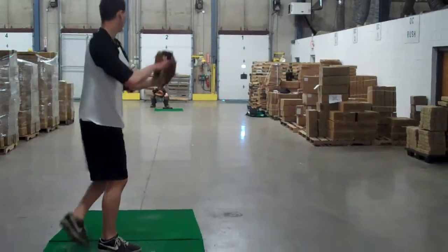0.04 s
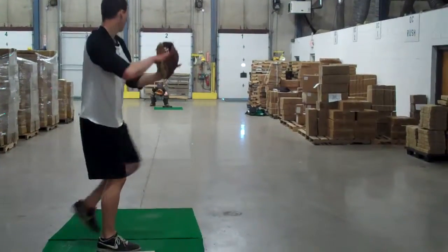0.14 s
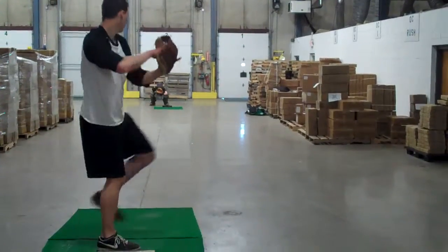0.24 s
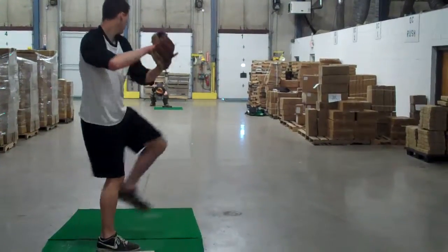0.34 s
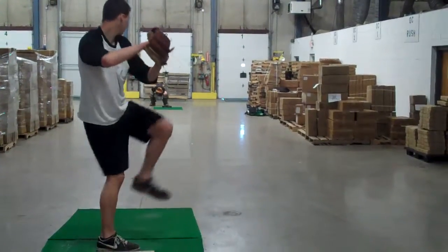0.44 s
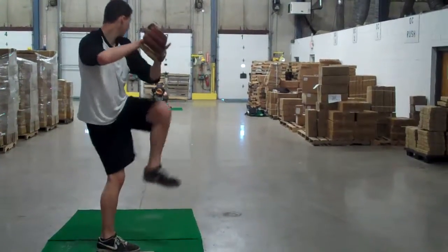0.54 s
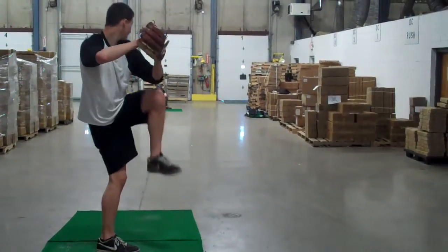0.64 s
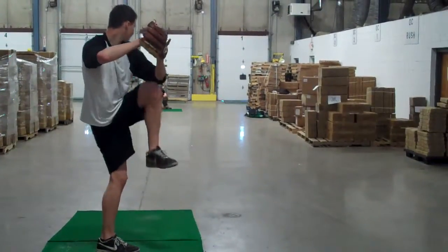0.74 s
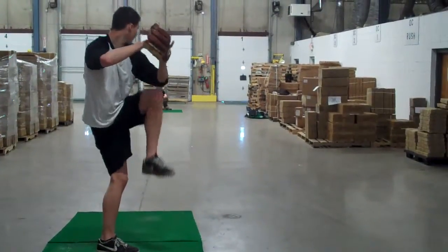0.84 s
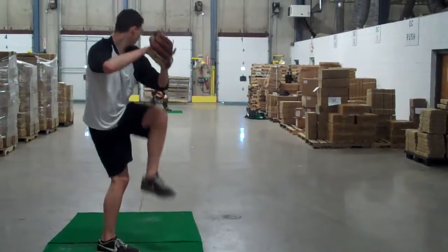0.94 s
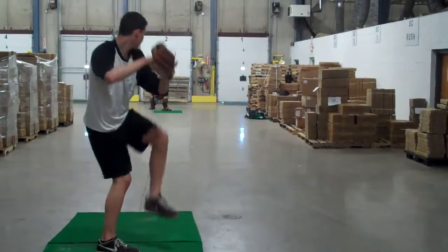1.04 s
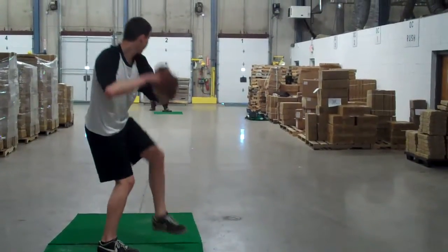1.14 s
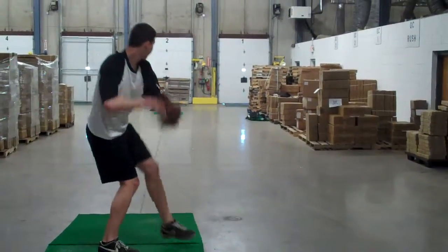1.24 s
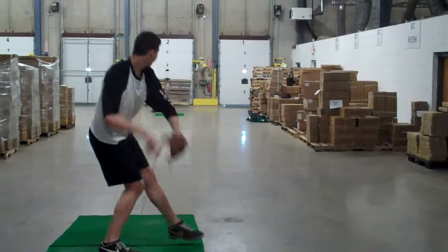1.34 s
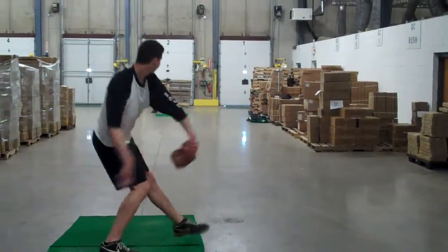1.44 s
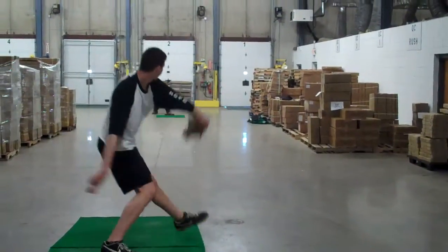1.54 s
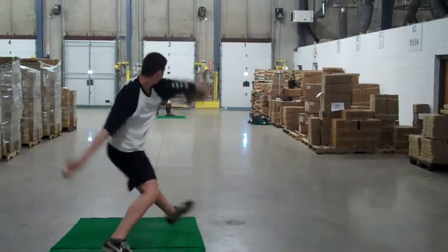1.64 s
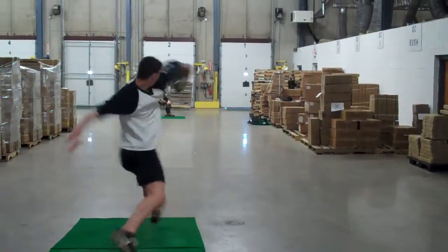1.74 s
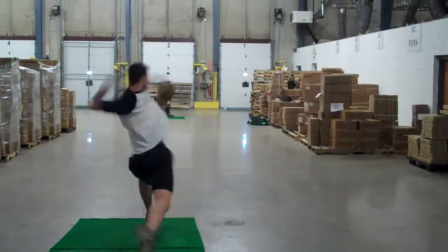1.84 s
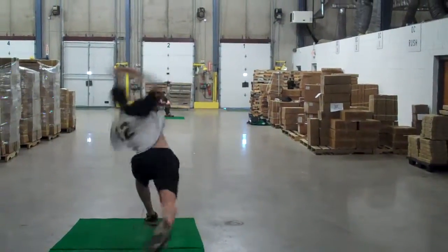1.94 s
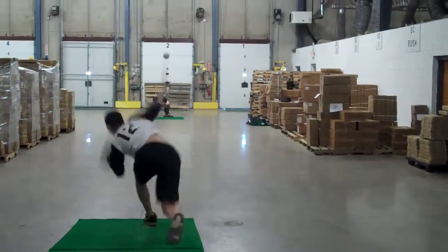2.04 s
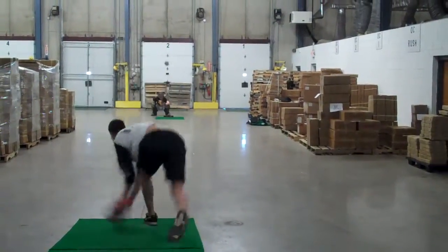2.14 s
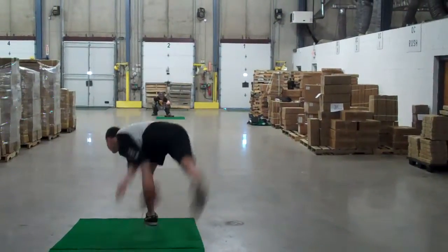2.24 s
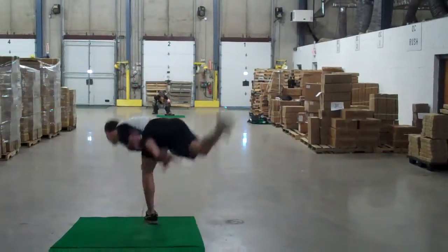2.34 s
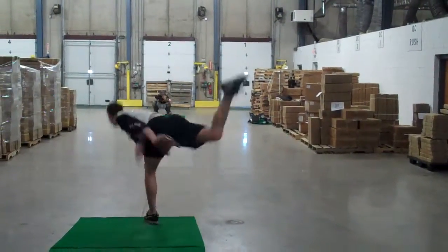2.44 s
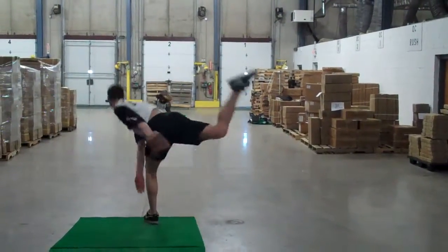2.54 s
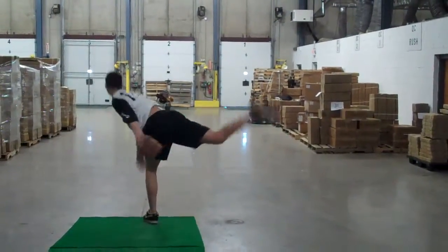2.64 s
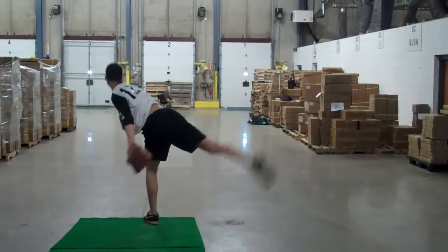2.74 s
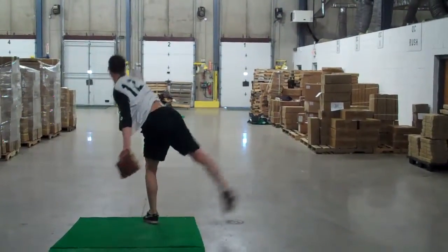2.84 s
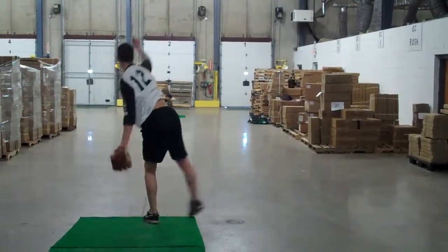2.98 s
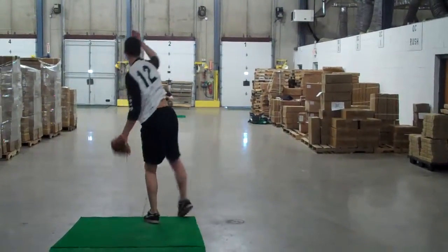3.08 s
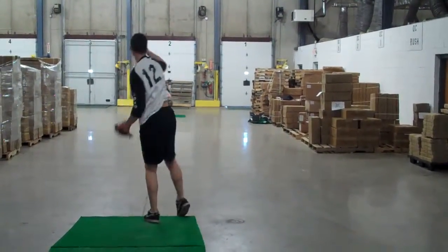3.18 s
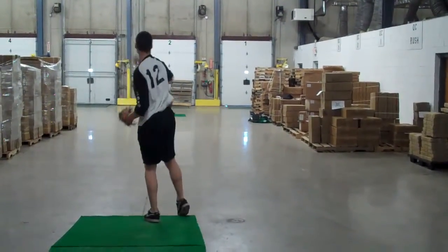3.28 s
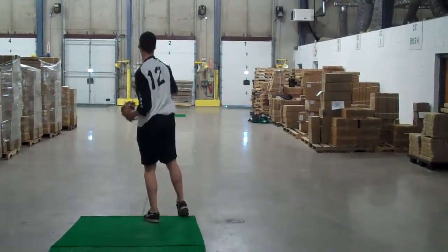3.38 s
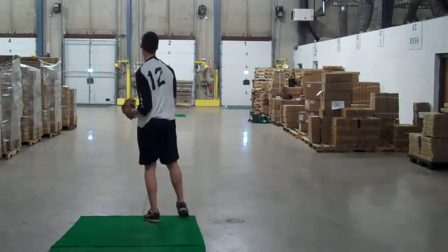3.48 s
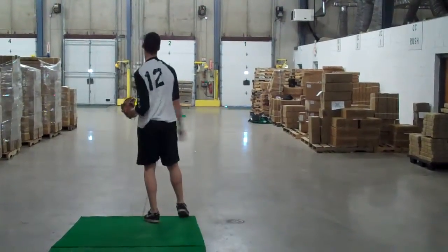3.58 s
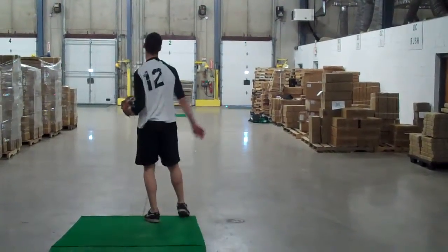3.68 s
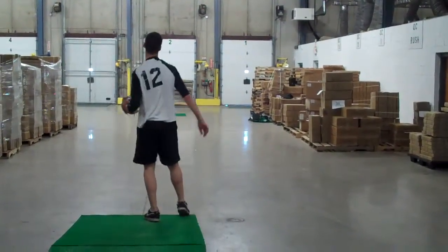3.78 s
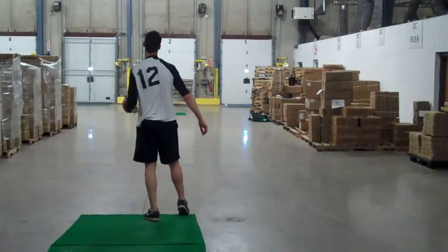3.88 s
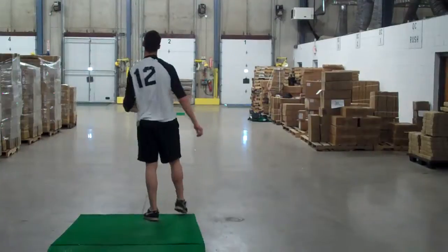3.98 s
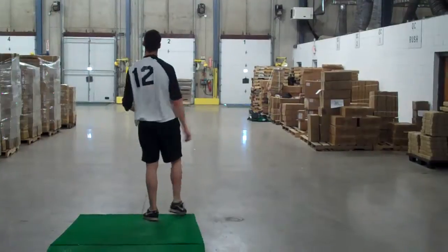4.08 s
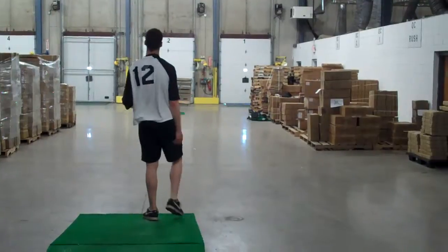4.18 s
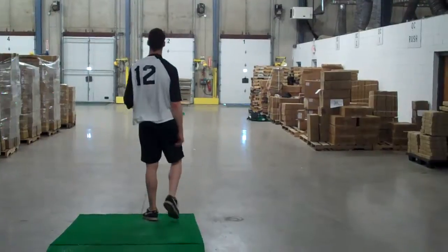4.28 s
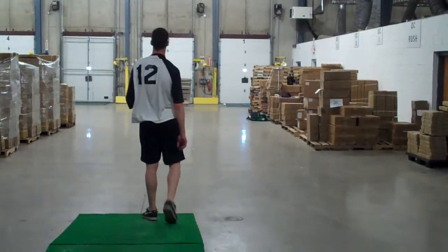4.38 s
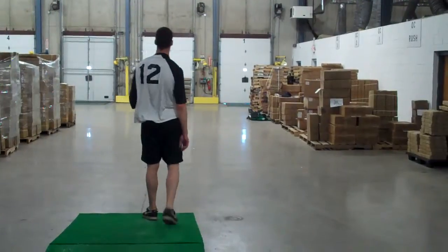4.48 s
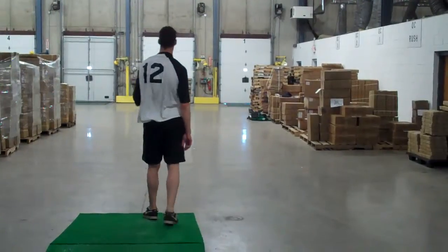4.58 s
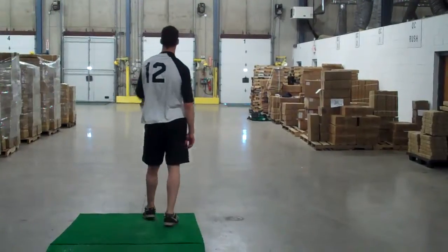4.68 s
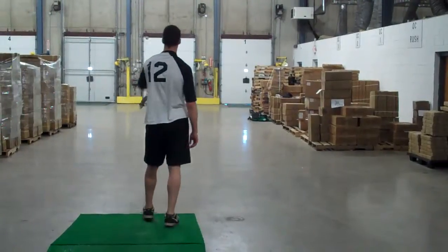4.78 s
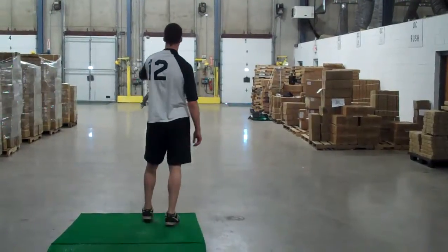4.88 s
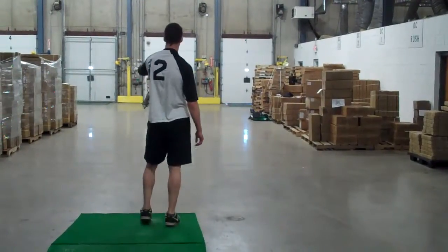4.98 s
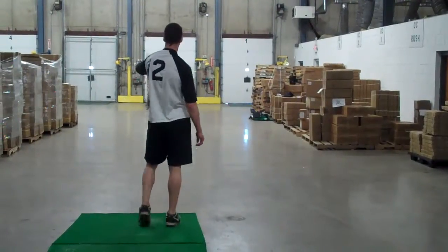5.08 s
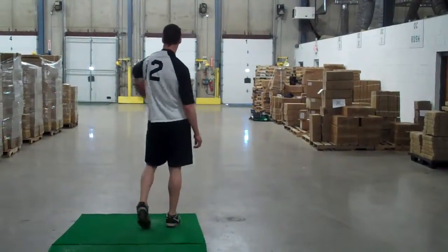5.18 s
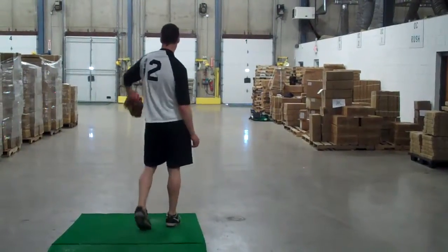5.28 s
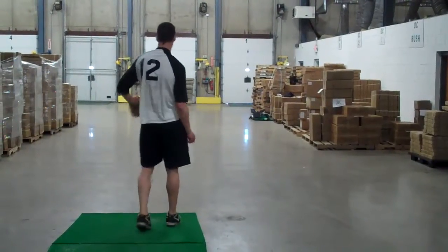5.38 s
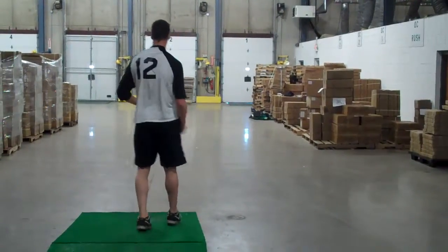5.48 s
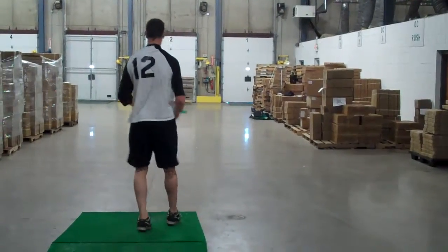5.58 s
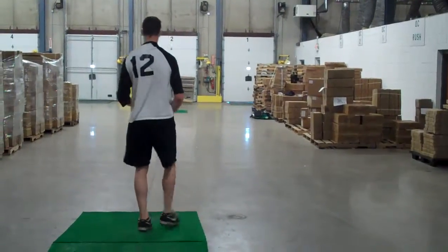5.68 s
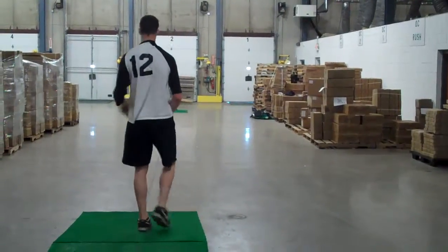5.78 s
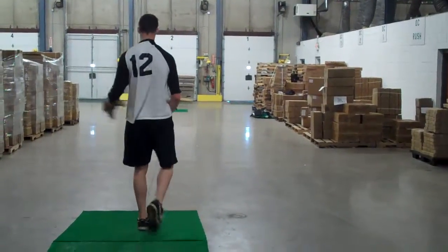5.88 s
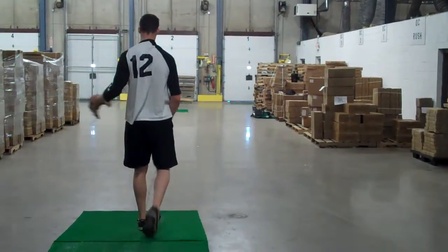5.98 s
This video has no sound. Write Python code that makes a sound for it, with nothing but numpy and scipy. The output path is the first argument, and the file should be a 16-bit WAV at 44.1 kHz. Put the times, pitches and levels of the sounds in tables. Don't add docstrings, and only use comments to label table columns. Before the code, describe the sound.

Low ventilation hum, a pitcher's footfalls and cloth swish, then a sharp leather pop ringing off bare walls, later a softer glove slap.

```python
import sys
import numpy as np
from scipy import signal
from scipy.io import wavfile

SR = 44100
rng = np.random.default_rng(int(sys.argv[2]) if len(sys.argv) > 2 else 0)


def voltage_ratio(decibels):
    exponent = np.asarray(decibels, float) / 20
    return 10 ** exponent


def inscribe(sig):
    pcm = np.round(np.clip(np.atleast_2d(sig).T, -1, 1) * 32767)
    wavfile.write(sys.argv[1], SR, pcm.astype(np.int16))


N = 265477
T = np.arange(N) / SR

# start_s [s], pocket_db [dB peak], crack_db [dB], left_right_db [dB]
POP_ARRIVALS = [(2.865, -3.5, -7.5, 2), (2.8663, -2, -17, 2), (2.8726, -10, -11.5, 1), (2.876, -6, -9.5, 6),
                (2.878, 0.5, -8.5, -2.5), (2.880, -5, -10, 0), (2.8838, -1, -10, 1), (2.888, -11, -11, -1),
                (2.895, -10.5, -11, 8), (2.902, -6, -13, 1), (2.908, 0.5, -23, -0.5), (2.9115, -1, -17, 4),
                (2.916, -9, -16, 2.5), (2.935, -8, -26, 1.2), (2.95, -12, -31, 7)]
# start_s [s], pocket_db [dB peak], crack_db [dB], left_right_db [dB]
CATCH_ARRIVALS = [(5.335, -14, -12, 2), (5.3366, -16.5, -16, 7), (5.3383, -20, -24, -4),
                  (5.342, -15.5, -35, 1.5), (5.3531, -7.5, -18.5, 4), (5.3554, -2, -29, -2.5),
                  (5.367, -6.5, -32, 4), (5.404, -17, -35, -1), (5.412, -19, -37, 3), (5.420, -28, -41, 2),
                  (5.431, -30, -39, 3), (5.474, -20, -21, 4), (5.478, -24, -20.5, 1), (5.4825, -12, -20, 1),
                  (5.486, -16, -25, 1), (5.49, -18, -26, 2.5)]
# pitch_hz [Hz], likeness [0-1]
HALL_LIKENESS = [(60, 1), (130, .98), (300, 1), (700, 0.95), (1400, 0.85), (3000, 0.56), (6000, 0.05),
                 (15000, 0)]


def rms_one(x):
    return x / np.sqrt(np.mean(x ** 2) + 1e-20)


def at_hz(points, hz):
    table_hz, values = np.array(points).T
    return np.interp(np.log(hz), np.log(table_hz), values)


def drift(rate_hz):
    r = np.exp(-80 * np.pi * rate_hz / SR)
    white = rng.standard_normal(N // 40 + 2002)
    slow = signal.lfilter([1], [1, -2 * r, r * r], white)[2000:]
    return np.interp(np.arange(N) / 40, np.arange(len(slow)), rms_one(slow))


def resonate(x, hz, width_hz):
    r = np.exp(-np.pi * width_hz / SR)
    feed = np.array([1, 0, -1]) * (1 - r * r) / 2
    return signal.lfilter(feed, [1, -2 * r * np.cos(2 * np.pi * hz / SR), r * r], x)


def resonate_twice(x, hz, width_hz):
    return resonate(resonate(x, hz, width_hz), hz, width_hz)


def bands(spectrum, likeness, size, order=2, count=3):
    edges = 20 * 2 ** (np.arange(int(9.7 * count) + 1) / count)
    centres = np.sqrt(edges[1:] * edges[:-1])
    gains = voltage_ratio(at_hz(spectrum, centres))
    gains = gains / np.sqrt(np.sum(gains ** 2 * np.diff(edges)) * 2.2 / SR)
    white = rng.standard_normal((2, 2, size))
    inside = (centres > spectrum[0][0]) & (centres < spectrum[-1][0] * 1.2)
    for k in np.flatnonzero(inside):
        sos = signal.butter(order, edges[k:k + 2], "band", fs=SR, output="sos")
        mid, side = signal.sosfilt(sos, white[k % 2])
        alike = np.clip(at_hz(likeness, centres[k]), 0, 1)
        stereo = np.sqrt((1 + alike) / 2) * mid + np.sqrt((1 - alike) / 2) * side * [[1], [-1]]
        yield centres[k], gains[k] * stereo


def burst(size, t60):
    x = rng.standard_normal(size) * voltage_ratio(-60 * T[:size] / t60)
    return x / np.abs(x).max()


def placed(x, s):
    out, i = np.zeros((2, N)), round(s * SR)
    out[:, i:i + x.shape[1]] = x[:, :N - i]
    return out


def struck_hide(modes, t60, top_hz, wide, solid, swell):
    size = len(swell)
    puff = swell * (burst(size, t60) + wide * burst(size, t60) * [[1], [-1]])
    puff = puff + solid * np.exp(-T[:size] / 0.00008)
    rung = sum((-1) ** k * voltage_ratio(db) * resonate(puff, hz, width_hz)
               for k, (hz, width_hz, db) in enumerate(modes))
    dull = signal.butter(3, np.clip(top_hz, 2000, 18000), fs=SR, output="sos")
    rung = signal.sosfilt(dull, rung)
    return rung / np.abs(rung).max()


def leather(arrivals, pocket, crack, pocket_t60, crack_t60, crack_db):
    size = 3000
    out = np.zeros((2, N))
    for s, pocket_db, bright_db, pan_db in arrivals:
        late = s - arrivals[0][0]
        swell = 1 - np.exp(-T[:size] / (.0001 + .012 * min(late, .05)))
        low = struck_hide(pocket, pocket_t60, 2600, wide=.15, solid=1.5, swell=swell)
        bright_top_hz = 15000 / (1 + late / 0.053)
        bright = struck_hide(crack, crack_t60, bright_top_hz, wide=.4, solid=.3, swell=swell)
        sound = voltage_ratio(pocket_db) * low + voltage_ratio(bright_db + crack_db) * bright
        i = round((s + .0008) * SR)
        out[:, i:i + size] += sound * voltage_ratio([[pan_db / 2], [-pan_db / 2]])
    return out


def push(s):
    # pitch_hz [Hz], width_hz [Hz], level_db [dB peak]
    pocket_air = [(184, 33, -25.5), (280, 92, -7), (60, 49, -35)]
    t = T[:4000]
    thump = sum(voltage_ratio(db) * np.sin(2 * np.pi * hz * t) * np.exp(-np.pi * w * t) for hz, w, db in pocket_air)
    return placed(thump[None], s)


def mitt_pop():
    # pitch_hz [Hz], width_hz [Hz], level_db [dB]
    mitt_pocket = [(524, 260, -7), (760, 270, -7), (1026, 190, -0.5), (1480, 470, -7.5)]
    # pitch_hz [Hz], width_hz [Hz], level_db [dB]
    mitt_crack = [(2690, 720, 2.5), (3960, 760, 4.5), (5500, 1600, -5.5), (8100, 1850, -13.5),
                  (12200, 2000, -38)]
    slap = leather(POP_ARRIVALS, mitt_pocket, mitt_crack, pocket_t60=0.0071, crack_t60=0.0097, crack_db=11.5)
    return voltage_ratio(0.5) * slap + push(POP_ARRIVALS[0][0] + 0.00071)


def glove_catch():
    # pitch_hz [Hz], width_hz [Hz], level_db [dB]
    glove_pocket = [(480, 350, -9), (810, 166, 2.5), (1700, 1200, -10.5)]
    # pitch_hz [Hz], width_hz [Hz], level_db [dB]
    glove_crack = [(2290, 980, -1.5), (3840, 640, 3.5), (5670, 1660, -2), (8000, 6300, -14.5),
                   (12040, 4000, -36)]
    return leather(CATCH_ARRIVALS, glove_pocket, glove_crack, pocket_t60=0.015, crack_t60=0.0093, crack_db=8.0)


def hall(spectrum, t60, rise_s, early_db, early_s, lumpy_db, size):
    t = T[:size]
    build = (1 - np.exp(-(t / rise_s) ** 2)) * (1 + voltage_ratio(early_db) * np.exp(-t / early_s))
    clusters = [lumpy_db * drift(44)[:size] for k in range(4)]
    ringing = 0
    for k, (hz, noise) in enumerate(bands(spectrum, HALL_LIKENESS, size, order=3, count=5)):
        ringing = ringing + noise * voltage_ratio(-60 * t / at_hz(t60, hz) + clusters[k // 3 % 4])
    return build * ringing


def pop_ringing():
    # pitch_hz [Hz], level_db [dB per Hz]
    pop_tail = [(59, -72.5), (100, -16), (157, -12.5), (245, -3), (480, -1), (531, -7.5), (979, -3),
                (1770, -7), (2120, -4), (4240, -10.5), (7970, -22.5), (10800, -29.5), (13000, -90)]
    # pitch_hz [Hz], t60_s [s]
    pop_decay = [(100, 1.6), (300, 1.3), (700, 1.7), (1200, 1.95), (2500, 1.42), (4000, 1.245),
                 (6000, 0.81), (9000, 0.56), (14000, .2)]
    return hall(pop_tail, pop_decay, rise_s=0.0048, early_db=1.0, early_s=0.097, lumpy_db=2.0, size=70000)


def catch_ringing():
    # pitch_hz [Hz], level_db [dB per Hz]
    catch_tail = [(88, -44), (150, -17), (329, -13.5), (368, -10), (706, -1.5), (952, -4), (1170, -14),
                  (1760, -1), (2010, -15.5), (2420, -5), (4160, -10), (8950, -24.5), (11000, -34),
                  (12500, -70)]
    # pitch_hz [Hz], t60_s [s]
    catch_decay = [(100, 1.9), (300, 0.96), (700, 1.62), (1200, 1.78), (2500, 1.24), (4000, 1.1),
                   (6000, 0.68), (9000, 0.64), (14000, 0.27)]
    tail = hall(catch_tail, catch_decay, rise_s=0.0028, early_db=-23, early_s=0.04, lumpy_db=2.5, size=32000)
    s, gap_s = CATCH_ARRIVALS[0][0], .016
    return placed(tail, s + gap_s) + voltage_ratio(-14.0) * placed(tail[::-1], s)


def thuds():
    # start_s [s], pitch_hz [Hz], t60_s [s], level_db [dB peak]
    landings = [(.907, 360, 0.05, -41), (.95, 330, .15, -51), (2.305, 330, .06, -40),
                (1.976, 107.8, 0.46, -35), (2.065, 383, 0.13, -35.5), (2.07, 638, 0.053, -35.5),
                (2.084, 106.8, 0.25, -37), (2.12, 417, 0.098, -42), (2.241, 520, 0.18, -35.5),
                (2.26, 184, 0.11, -32), (2.29, 261, 0.04, -32.5)]
    out = 0
    for s, hz, t60, db in landings:
        t = np.maximum(T - s, 0)
        swell = 1 - np.exp(-t / 0.0054)
        sagging = np.sin(2 * np.pi * hz * t * (1 - 0.46 * np.minimum(t, .3)))
        out = out + voltage_ratio(db - 60 * t / t60) * swell * sagging
    return out


def ticks():
    # start_s [s], level_db [dB peak], centre_hz [Hz], t60_s [s]
    snaps = [(.480, -52, 3500, .012), (0.9039, -32.5, 3000, 0.026), (.9052, -30.5, 1700, 0.039),
             (.932, -47.5, 1900, .05), (1.067, -40.5, 3300, .015), (1.220, -43, 4000, 0.013),
             (1.9138, -36, 5500, 0.0061), (1.9502, -31, 3160, 0.036), (1.952, -37, 1200, 0.031),
             (1.976, -35.5, 5000, 0.048), (2.192, -38, 4120, 0.047), (2.2215, -38, 2500, 0.027),
             (2.252, -36, 2460, .015), (3.389, -39, 2440, .03), (3.911, -44, 2480, .018),
             (4.70, -53, 3000, .044), (4.745, -45, 3500, .028), (5.9988, -34, 1800, 0.014)]
    # start_s [s], level_db [dB peak], pitch_hz [Hz]
    rings = [(.9042, -40, 5100), (.906, -49, 3040), (.934, -39, 1550), (.938, -46, 3580), (.946, -48, 1980),
             (.988, -54, 3400), (1.221, -51, 1340), (1.9501, -38, 1470), (1.952, -42.5, 495),
             (1.953, -41, 5100), (1.976, -38, 2020), (1.978, -38.5, 5230), (2.2215, -34, 746),
             (3.389, -33, 3300), (3.911, -41, 1360), (4.70, -51, 1470), (5.9984, -29.5, 1420)]
    size = 4000
    out = np.zeros(N + size)

    def puff(t60):
        return burst(size, t60) * (1 - np.exp(-T[:size] / (0.034 * t60)))

    def add(s, db, x):
        i = round(s * SR)
        out[i:i + size] += voltage_ratio(db) * x / np.abs(x).max()

    for s, db, hz, t60 in snaps:
        sos = signal.butter(3, [hz / 3, min(hz * 2, 9500)], "band", fs=SR, output="sos")
        add(s, db, signal.sosfilt(sos, puff(t60)))
    for s, db, hz in rings:
        add(s, db, resonate_twice(puff(.025), hz, width_hz=340))
    return out[:N]


def gestures(rows):
    power = 0
    for s, swell, db in rows:
        t = T - s
        rise = np.exp(-2 * (t / swell) ** 2)
        fade = np.exp(-2 * np.abs(t) / (1.44 * swell))
        power = power + voltage_ratio(2 * db) * np.where(t < 0, rise, fade)
    return np.sqrt(power)


def grainy(spectrum):
    noise = sum(noise for hz, noise in bands(spectrum, HALL_LIKENESS, N))
    return noise * voltage_ratio(1.5 * drift(70))


def body():
    # peak_s [s], swell_s [s], level_db [dB]
    weight = [(1.995, 0.022, -42), (2.104, 0.035, -42), (2.256, .05, -41), (2.31, 0.024, -41.5),
              (2.45, .06, -50)]
    # peak_s [s], swell_s [s], level_db [dB]
    drags = [(.01, .05, -59), (.99, 0.073, -55), (2.064, 0.052, -44.5), (2.104, 0.042, -43.5),
             (2.256, 0.07, -46.5), (2.4, 0.087, -51), (2.6, 0.086, -57), (4.6, 0.31, -57),
             (4.72, 0.044, -54.5), (4.85, 0.054, -54), (5.05, 0.095, -58)]
    # peak_s [s], swell_s [s], level_db [dB]
    sweeps = [(.1, 0.056, -57.5), (1.99, 0.018, -45), (2.09, 0.095, -45.5), (2.256, .05, -46),
              (2.4, 0.083, -56), (2.55, 0.078, -56), (4.55, 0.11, -58), (4.74, 0.11, -57.5),
              (4.87, .05, -62)]
    # pitch_hz [Hz], level_db [dB per Hz]
    scrape = [(250, -2), (400, 3), (800, 2), (1500, 3), (2500, -6.5), (3500, -41)]
    # pitch_hz [Hz], level_db [dB per Hz]
    swish = [(1800, -5.5), (2800, 5), (4000, 1), (5500, -1), (7000, -3), (9500, -7.5), (11500, -25),
             (14000, -36)]
    white = rng.standard_normal(N)
    mat = rms_one(resonate(white, 93, 26) + voltage_ratio(-2.5) * resonate(white, 157, 86))
    rumble = voltage_ratio(-2.0) * gestures(weight) * mat
    return rumble + gestures(drags) * grainy(scrape) + gestures(sweeps) * grainy(swish)


def squeaks():
    # start_s [s], length_s [s], pitch_hz [Hz], width_hz [Hz], level_db [dB]
    slips = [(1.388, 0.03, 2780, 27, -56), (1.978, 0.033, 2800, 32, -42), (2.7, .012, 8300, 300, -62),
             (4.816, 0.07, 1915, 60, -50.5), (4.815, 0.12, 1495, 150, -53.5),
             (4.885, 0.034, 1890, 100, -50), (4.85, 0.05, 2500, 300, -59.5)]
    white = rng.standard_normal(N)
    pure = 0.63
    out = 0
    for s, length_s, hz, width_hz, db in slips:
        attack = np.clip((T - s) / 0.0023, 0, 1)
        fade = np.exp(-np.maximum(T - s, 0) ** 2 / length_s ** 2)
        tone = np.sqrt(2 * pure) * np.sin(2 * np.pi * hz * T)
        breath = np.sqrt(1 - pure) * rms_one(resonate_twice(white, hz, width_hz))
        out = out + voltage_ratio(db) * attack * fade * (tone + breath)
    return out


def hum():
    # pitch_hz [Hz], level_db [dB per Hz]
    vent_air = [(15, -6.5), (30, -6.5), (45, -16.5), (89, -6.5), (121, -8), (150, -11), (280, -18.5),
                (500, -19.5), (1000, -22), (2000, -24.5), (3500, -27.5), (6000, -30), (8000, -38.5),
                (10500, -41.5), (14000, -62)]
    # pitch_hz [Hz], likeness [0-1]
    vent_likeness = [(60, 0.96), (130, 1), (300, 0.85), (700, 0.83), (1400, 0.48), (3000, 0.14),
                     (6000, 0.09), (15000, .05)]
    # pitch_hz [Hz], level_db [dB rms]
    lamps = [(120, -54), (479.5, -74), (840, -74), (1200, -76), (1320, -71), (1680, -78), (1920.5, -68),
             (2520, -80), (7860, -84)]
    air = sum(noise * voltage_ratio(0.83 * drift(0.5)) for hz, noise in bands(vent_air, vent_likeness, N))
    fan = rms_one(resonate_twice(rng.standard_normal(N), 118.4, width_hz=22.6))
    lines = 0
    for hz, db in lamps:
        start, lean = rng.random(2)
        turns = hz * T + start + lean * hz / 40000 * np.array([[1], [-1]])
        lines = lines + np.sqrt(2) * voltage_ratio(db + drift(2.1)) * np.sin(2 * np.pi * turns)
    return voltage_ratio(-51.5) * air + voltage_ratio(-55.5) * fan + lines


def scene():
    pop_hall = pop_ringing()
    ringing = voltage_ratio(-13.0) * placed(pop_hall, POP_ARRIVALS[0][0]) + voltage_ratio(-18.5) * catch_ringing()
    small = ticks() + thuds()
    wet = signal.fftconvolve(small[None], pop_hall, axes=1)[:, :N]
    diffuse = ringing + small + voltage_ratio(-50.5) * wet + squeaks() + body() + hum()
    left_db = 1.3
    return mitt_pop() + glove_catch() + diffuse * voltage_ratio([[left_db / 2], [-left_db / 2]])


def top_cut(x):
    return signal.sosfilt(signal.butter(12, 16360, fs=SR, output="sos"), x)


def record(dry):
    release = 20.5 * T
    level_db = 20 * np.log10(np.abs(dry).max(axis=0) + 1e-6)
    held_db = np.maximum.accumulate(level_db + release) - release
    r = np.exp(-1 / (0.0073 * SR))
    duck_db = signal.lfilter([1 - r], [1, -r], 0.52 * np.maximum(held_db + 8, 0))
    mic = signal.sosfilt(signal.butter(4, 15000, fs=SR, output="sos"), dry)
    return top_cut(np.clip(mic * voltage_ratio(-duck_db), -1, 1))


dry = scene()
out = record(dry)
inscribe(out)
```